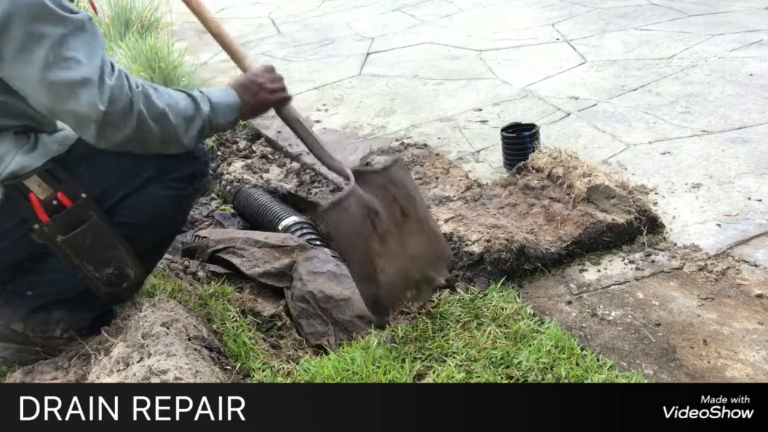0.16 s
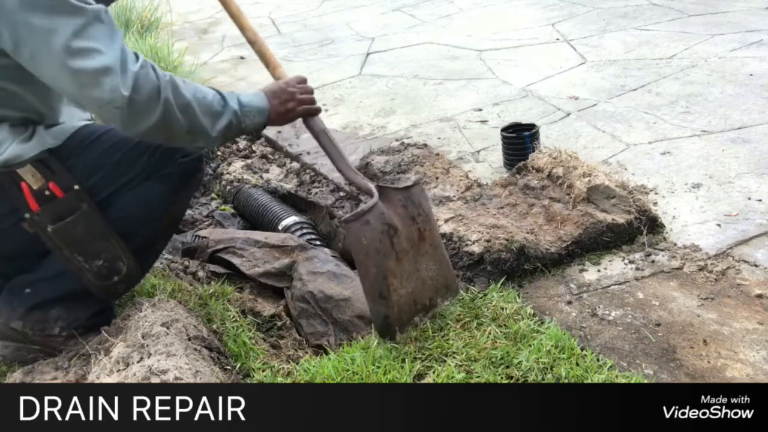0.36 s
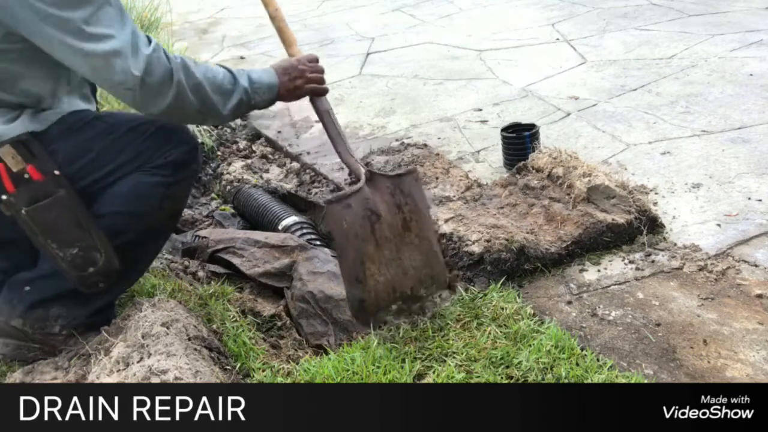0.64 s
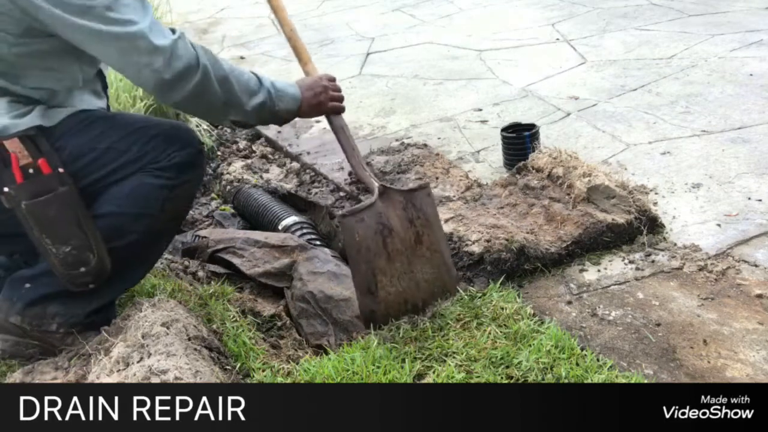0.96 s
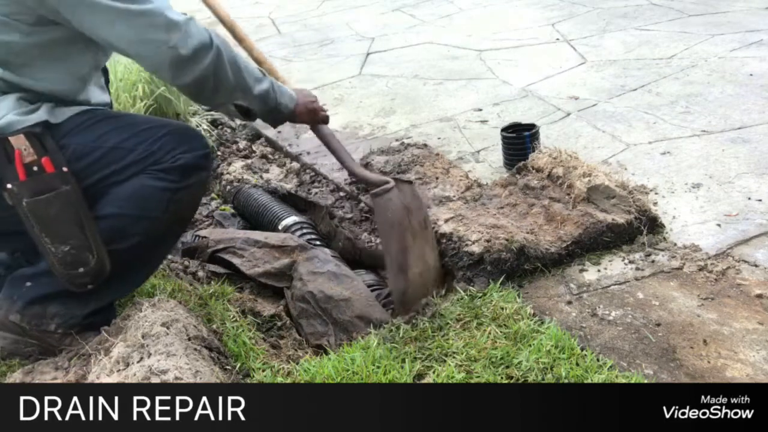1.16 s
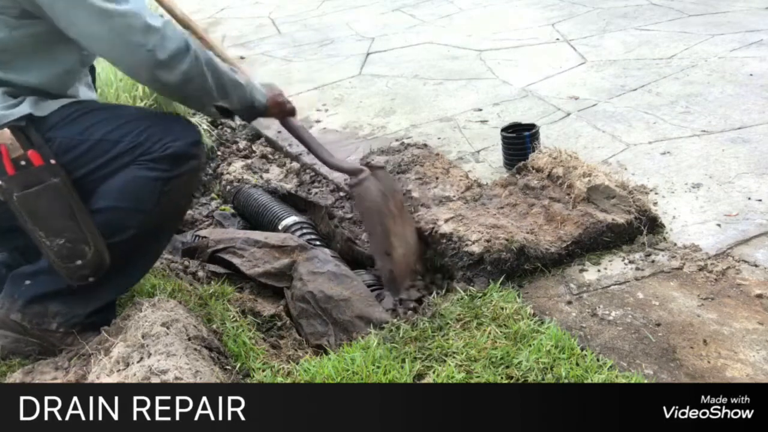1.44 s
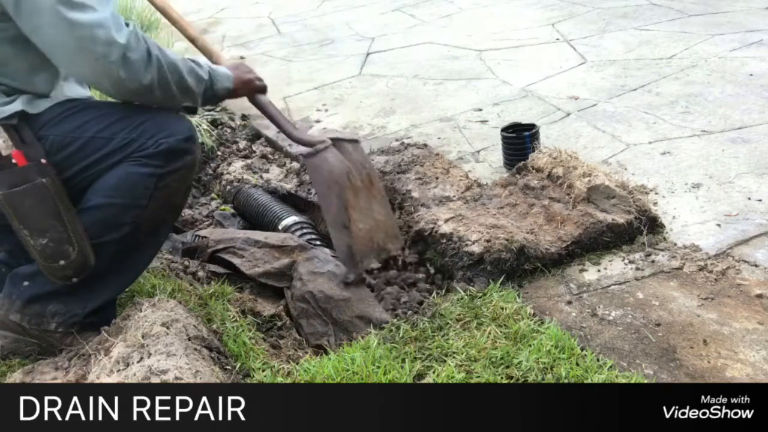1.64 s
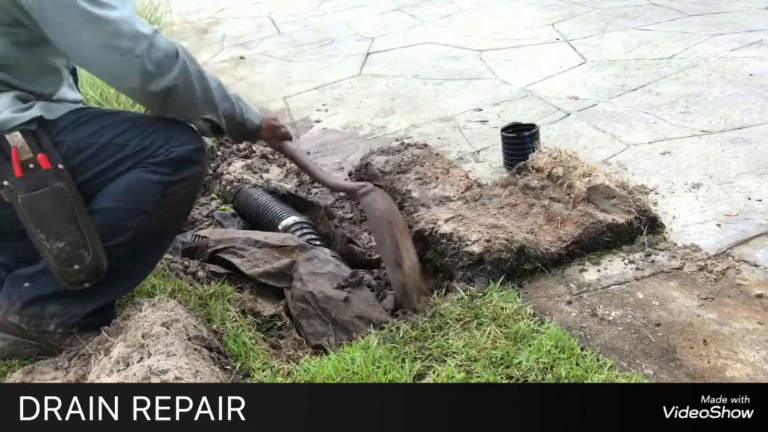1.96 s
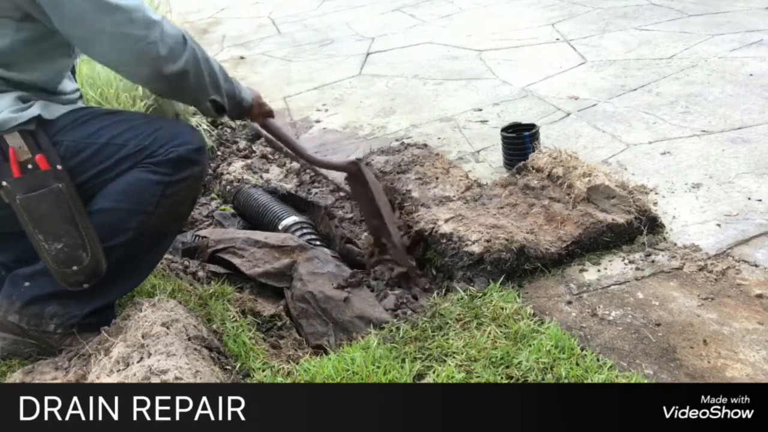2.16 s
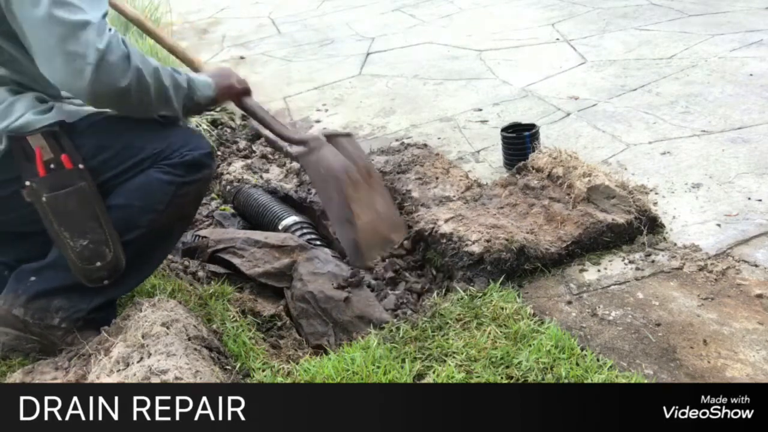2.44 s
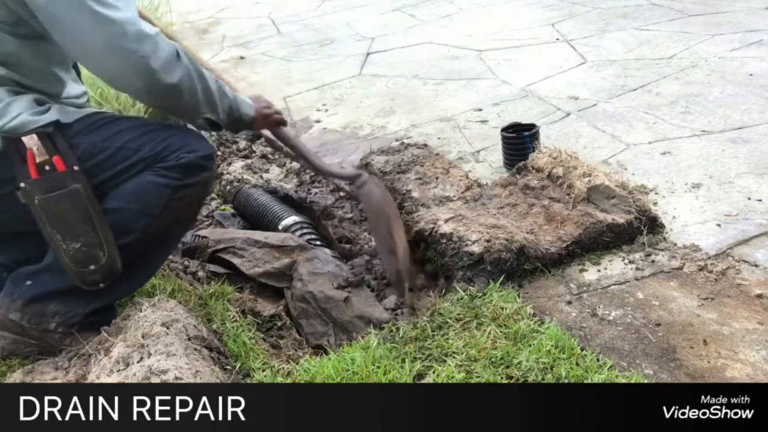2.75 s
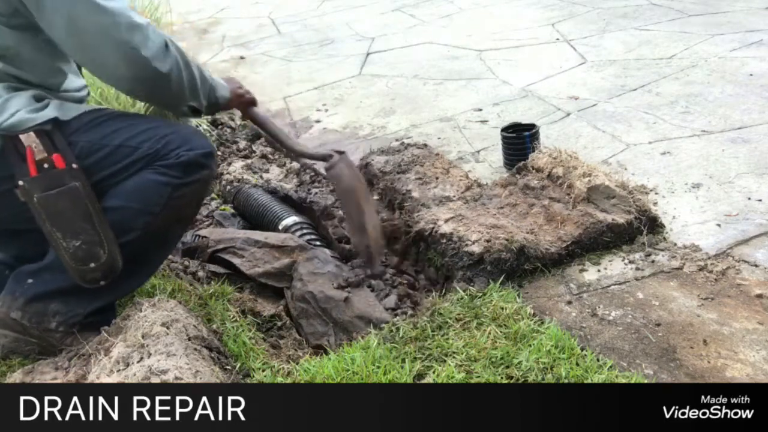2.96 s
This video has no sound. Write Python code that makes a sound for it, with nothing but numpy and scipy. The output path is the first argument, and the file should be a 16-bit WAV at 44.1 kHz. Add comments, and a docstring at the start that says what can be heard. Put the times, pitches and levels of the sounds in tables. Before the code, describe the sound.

A steel shovel scrapes and clanks through damp, stony soil, pushing it into a trench.

```python
"""An open yard, microphone close to a trench: a steel shovel pushes damp, stony soil back in with a few strokes.
Grit and soil are swarms of tiny pings; stones crack as noise bursts and set the modes of the blade ringing.
Brief squeals are wavering tones; crumbs and clods drop as noise bursts, the clods with a low knock.
Soft rustles come before the first stroke. Far off, engine tones and a drone hum over a low outdoor rumble."""
import sys
import numpy as np
from scipy import signal
from scipy.fft import rfft, irfft, next_fast_len
from scipy.io import wavfile
from scipy.ndimage import map_coordinates

SR = 44100
rng = np.random.default_rng(int(sys.argv[2]) if len(sys.argv) > 2 else 0)


def write(x):
    x = np.atleast_2d(x).T
    wavfile.write(sys.argv[1], SR, np.round(np.clip(x, -1, 1) * 32767).astype(np.int16))


N = 136710  # samples, 3.1 s

# Colour of landing crumbs, also of the yard's answer. Each row: frequency in Hz, gain in dB.
CRUMB_COLOUR = [(100, -51), (350, 4.5), (700, 1), (2000, 5.5), (4000, 5), (6500, 1), (8500, -8.5),
                (15500, -13.5)]


def amp(db):
    """Decibels to gain."""
    return 10 ** (np.asarray(db) / 20)


def unit(x):
    """Scaled to rms 1."""
    return x / np.sqrt(np.mean(x ** 2) + 1e-20)


def along(points, hz):
    """Gain read from (Hz, dB) points on a log frequency axis."""
    f, v = np.transpose(points)
    return amp(np.interp(np.log(hz + 1), np.log(f + 1), v))


def tilted(points, tilt_db):
    """A spectrum made brighter or duller above 1 kHz, in dB per octave."""
    return lambda hz: along(points, hz) * amp(tilt_db * np.log2(np.maximum(hz, 1000)))


def filtered(x, response):
    """x times a response of frequency."""
    m = next_fast_len(len(x) + 8192)
    spectrum = rfft(x, m) * response(np.fft.rfftfreq(m, 1 / SR))
    return irfft(spectrum, m)[:len(x)]


def wobble(rate, size=N):
    """A smooth random curve, rate knots a second."""
    knots = rng.standard_normal(4096)
    return map_coordinates(knots, [np.arange(size) * rate / SR], mode="wrap")


def fading(t, t60):
    """Exponential decay that falls by 60 dB in t60 seconds."""
    return np.exp(-np.log(1000) * t / t60)


def burst(response, rise_s, t60):
    """Coloured noise that rises fast and dies away."""
    t = np.arange(SR // 4) / SR
    noise = unit(filtered(rng.standard_normal(len(t)), response))
    return noise * (1 - np.exp(-t / rise_s)) * fading(t, t60)


def add(out, s, x):
    """Mix x into out at time s."""
    part = out[round(s * SR):][:len(x)]
    part += x[:len(part)]


def grains(per_s, spread_db, top_hz, life_s=.0017, size=256):
    """Tiny random contacts, each a short ping of its own pitch: many weak, a few strong."""
    chance = rng.random((N, 4))
    start = np.flatnonzero(chance[:, 0] < per_s / SR)
    _, pitch, strength, phase = chance[start].T.astype("f4")[:, :, None]
    hz = pitch * min(top_hz, SR / 2)
    gain = amp(-spread_db * np.log(np.maximum(strength, .004)))
    t = np.arange(size, dtype="f4") / SR
    pings = gain * np.exp(-t / life_s) * np.sin(2 * np.pi * (hz * t + phase))
    places = start[:, None] + np.arange(size)
    return np.bincount(places.ravel(), pings.ravel(), N)[:N]


def seating(t):
    """How the blade sits in the soil at time t: firmer seating damps its ring sooner."""
    # Each row: time in seconds, level of the ring in dB, brightness of the ring in dB per octave,
    # t60 of the ring in seconds, gain of the coarse low grit in dB.
    blade_seats = [(.85, -1, -5.5, 0.052, -4), (1.24, -2, -3.5, .04, -2), (1.42, -4, -6, 0.014, -2.5),
                   (2.1, -2, 5, 0.032, 1), (2.73, -0.5, -5.5, 0.059, -5.5), (2.85, 0, 1.5, 0.032, 1),
                   (2.95, -7, 2, 0.13, 0.5)]
    s, *columns = np.transpose(blade_seats)
    return [np.interp(t, s, c) for c in columns]


def scraping():
    """Grit grinds in judders along the blade while the soil ahead of it crumbles."""
    # Movements of the blade, one list each. Each row: time in seconds, level of the grinding in dB,
    # level of the shifting soil in dB (both before the trims below), treble lift of the grinding in dB.
    movements = [
        [(.87, -39.5, -31.5, 11), (.925, -46.5, -64, -5), (1.01, -47, -46.5, 5), (1.05, -35.5, -43, -2),
         (1.085, -39.5, -34.5, -6), (1.125, -25, -29.5, -3), (1.18, -25.5, -37.5, 0), (1.245, -21, -34, -0.5),
         (1.3, -23.5, -41, -2.5), (1.33, -30.5, -43.5, 3), (1.445, -35.5, -56, 0.5), (1.49, -27.5, -48.5, 3),
         (1.565, -29, -43.5, 2), (1.585, -38, -45, 1), (1.64, -63, -50, -7)],
        [(1.64, -50, -64, -7), (1.68, -44.5, -37, -7), (1.705, -47.5, -50.5, -4), (1.745, -36, -35.5, -13),
         (1.775, -43, -42, -11), (1.835, -54, -61, -4), (1.88, -50, -37, -20), (1.912, -52, -55, 1)],
        [(1.935, -58, -31, 3), (1.955, -36.5, -42, 2), (1.985, -28.5, -38.5, 1), (2.01, -35.5, -45, -3),
         (2.025, -21.5, -39.5, -1.5), (2.09, -29, -38.5, 7), (2.155, -22.5, -44, 0.5), (2.2, -30.5, -42, -1),
         (2.245, -27, -43.5, 3), (2.285, -34, -36.5, -20), (2.305, -55, -50, 12), (2.35, -50.5, -55, -6),
         (2.425, -51, -47.5, -2), (2.6, -62, -61, -13), (2.712, -54, -51, 3)],
        [(2.735, -25, -35, -10), (2.775, -22.5, -41.5, 3), (2.81, -25, -35, 1.5), (2.822, -22, -31.5, 14),
         (2.845, -19.5, -23.5, 3), (2.868, -31, -41, 1), (2.916, -40.5, -51, 6.5), (2.96, -32, -50.5, 1),
         (3.028, -26, -40.5, 1), (3.046, -23.5, -31.5, 7.5), (3.06, -23.5, -37, -9), (3.1, -29, -54, -21)],
    ]
    # Colour of the grit. Each row: frequency in Hz, gain in dB.
    grit_colour = [(100, -50), (300, -19), (860, -13), (1050, -3), (1450, -1), (2250, -3.5), (2870, -2),
                   (5300, -2.5), (6500, -4), (7800, -11), (9700, -6), (10500, -11.5), (15500, -13.5)]
    # Colour of the soil. Each row: frequency in Hz, gain in dB.
    soil_colour = [(60, -49), (150, -17), (280, 4.5), (550, 7), (1100, 3), (1800, -3.5), (4000, -26)]
    grit_trim_db, soil_trim_db = -1.5, -0.5
    treble_hz, coarse_hz = 6000, 2100  # where the treble lift sets in, where the coarse grit ends
    t = np.arange(N) / SR
    grind, shift, lift = np.zeros((3, N))
    for movement in movements:
        s, grind_db, shift_db, treble_db = np.transpose(movement)
        during = (t >= s[0]) & (t <= s[-1])
        grind += during * amp(np.interp(t, s, grind_db))
        shift += during * amp(np.interp(t, s, shift_db))
        lift += during * np.interp(t, s, treble_db)
    judder = unit(amp(1.4 * wobble(260)))

    grit_grains = grains(per_s=16000, spread_db=2, top_hz=16500)
    grit_texture = unit(filtered(grit_grains, lambda hz: along(grit_colour, hz)))
    grit = amp(grit_trim_db) * grind * judder * grit_texture
    treble = filtered(grit, lambda hz: 1 - 1 / (1 + (hz / treble_hz) ** 6))
    grit = grit + (amp(lift) - 1) * treble
    coarse_db = seating(t)[-1]
    coarse = filtered(grit, lambda hz: 1 / (1 + (hz / coarse_hz) ** 6))
    grit = grit + (amp(coarse_db) - 1) * coarse

    soil_grains = grains(per_s=1800, spread_db=1, top_hz=2500)
    soil_texture = unit(filtered(soil_grains, lambda hz: along(soil_colour, hz)))
    soil = amp(soil_trim_db) * shift * judder * soil_texture
    return grit, soil


def strikes():
    """Each stone cracks against the edge of the blade."""
    # Each row: start in seconds, level in dB before the trim, brightness in dB per octave, t60 in seconds.
    stones = [(.464, -25.5, 4, 0.016), (.486, -37, 0, 0.014), (0.523, -30.5, 5, 0.03),
              (0.835, -9, -1, 0.04), (0.855, -6.5, 0, 0.058), (1.0601, -13.5, -2, 0.024),
              (1.093, -14, -2.5, 0.039), (1.1413, -5, 0.5, 0.018), (1.1948, -11, -2, 0.021),
              (1.2293, -11, -14, 0.032), (1.241, -6.5, -1.5, 0.036), (1.268, -7, 10, 0.0096),
              (1.293, -8.5, 0, 0.023), (1.9166, -15.5, 0, .07), (1.92, 3, 8, 0.0094),
              (1.927, -8.5, -1, 0.023), (1.933, -5, -0.5, 0.016), (1.995, -6, 0, 0.024),
              (2.0167, 1.5, 4, 0.0068), (2.0324, -3.5, 1, .012), (2.049, -12, -7, 0.0047),
              (2.063, -5.5, 7.5, 0.023), (2.715, -17.5, 3.5, 0.041), (2.7282, 1, 0, 0.031),
              (2.751, 0.5, 1, 0.014), (2.793, -3.5, 3.5, 0.024), (2.823, -7, -2, 0.037),
              (2.835, -5, 0, 0.06), (2.93, -19.5, 5, 0.043), (3.043, -7, 1.5, 0.079),
              (3.075, -9, -1, 0.035)]
    # Colour of the crack. Each row: frequency in Hz, gain in dB.
    crack_colour = [(60, -35), (200, -8.5), (500, -25), (1100, -3), (1900, 2.5), (3500, 4), (5800, 3),
                    (7500, -4), (10500, -6), (15500, -16)]
    trim_db, rise_s = -7.5, .0005
    out = np.zeros(N)
    for s, db, tilt_db, t60 in stones:
        add(out, s, amp(db + trim_db) * burst(tilted(crack_colour, tilt_db), rise_s, t60))
    return out


def blade(force):
    """The steel rings in its modes; the soil sliding over it keeps changing their strength and tuning."""
    # Modes of the blade. Each row: frequency in Hz before detuning, relative level in dB.
    modes = [(715, 2), (1000, 0), (1410, 2.5), (1906, 0), (2068, 12), (2270, 8.5), (2400, 4), (2875, 1),
             (3225, 6.5), (3490, 2), (4005, 1.5), (4538, 1.5), (5180, -2), (5390, 9), (5785, 3.5),
             (6130, 3), (6380, 7.5), (6790, 0), (8172, -2), (9580, 2.5), (9965, 3), (10915, 5), (11600, 6)]
    load_step_s, load_spread_db = .06, 2.5  # how often the soil reloads the blade, how unevenly
    load_detune, bedded_t60 = .005, .04  # share of detuning at this t60 in seconds; a shorter ring detunes more
    step = round(load_step_s * SR)
    t = np.arange(SR // 6) / SR
    hz, db = np.transpose(modes)
    out, force = np.zeros(N + step), np.pad(force, step)
    for start in range(0, N, step):
        ring_db, tilt_db, t60, _ = seating(start / SR)
        strength, detune, phase = rng.standard_normal((3, len(hz)))
        gain = amp(db + tilt_db * np.log2(hz) + load_spread_db * strength)
        tuned = hz * (1 + load_detune * detune * bedded_t60 / t60)
        tones = np.sin(2 * np.pi * (np.outer(tuned, t) + phase[:, None]))
        ring = gain @ tones * fading(t, t60)
        # overlapping half-sine windows pass the force from one loading to the next
        push = force[start:][:2 * step]
        push = push * np.sin(np.pi * np.arange(len(push)) / (2 * step))
        rung = signal.fftconvolve(push, ring / np.linalg.norm(ring))
        add(out, start / SR, amp(ring_db) * rung)
    return out[step:]


def squeals():
    """A stone sticks and slips on the steel: short tones, clean or rough, that swell quickly and fade."""
    # Each row: start in seconds, level in dB before flutter, pitch in Hz before waver,
    # length in seconds (the peak comes at a quarter of it), roughness as a factor.
    slips = [(.47, -40, 2050, 0.034, 0.4), (.518, -37.5, 2060, 0.029, 0.2), (0.855, -19, 2105, 0.018, 0.1),
             (0.852, -19, 3515, 0.015, .2), (1.089, -22, 4640, 0.016, 1.3),
             (1.11, -18.5, 2050, 0.019, 0.36), (1.232, -18.5, 2300, 0.034, 0.75),
             (1.631, -37, 2090, 0.023, 0.2), (2.736, -15, 2090, 0.015, 0.17), (2.814, -22, 8140, 0.022, .2),
             (2.823, -10, 1910, 0.0089, 0.54), (2.87, -25, 1830, 0.013, 1.1),
             (3.036, -18.5, 5500, .016, 0.8)]
    waver_rad, flutter_db, knots_per_s = 1.3, 3, 450  # depths at roughness 1
    t = np.arange(SR // 8) / SR
    out = np.zeros(N)
    for s, db, hz, length, rough in slips:
        u = 4 * t / length
        waver, flutter = [rough * wobble(knots_per_s, size=len(t)) for _ in range(2)]
        swell = amp(db + flutter_db * flutter) * u * np.exp(1 - u)
        add(out, s, swell * np.sin(2 * np.pi * hz * t + waver_rad * waver))
    return out


def falling_soil():
    """Crumbs land with a short crunch, clods with a brief low knock and a dull thud."""
    # Crumbs and pebbles. Each row: start in seconds, level in dB before the trim, brightness in dB per octave.
    landings = [(0.957, -31, 9), (0.9833, -25, 4), (1.6049, -23.5, 4.5), (1.636, -29, 2), (1.666, -31, 5),
                (1.7133, -24.5, 0.5), (1.726, -21, -0.5), (1.7497, -19.5, -2), (1.792, -35, 0),
                (1.8135, -25, 3), (1.85, -28, 2.5), (1.87, -32, 1), (2.3105, -27.5, 5.5),
                (2.373, -26.5, -2.5), (2.419, -24.5, -6), (2.46, -36, -1), (2.482, -34, 3.5),
                (2.5424, -31, -3), (2.607, -35, -8)]
    # Clods into the trench. Each row: start in seconds, level in dB before the trims, pitch in Hz.
    thuds = [(.838, -36, 1100), (0.858, -17, 520), (1.047, -22, 905), (1.07, -27, 530), (1.431, -21.5, 453),
             (1.657, -24, 494), (1.712, -19.5, 414), (1.7525, -11.5, 604), (1.758, -25, 960),
             (1.794, -20, 365), (1.862, -16, 644), (1.871, -27, 680), (1.93, -14, 630), (2.422, -33, 950),
             (2.431, -24, 549.6), (2.466, -24, 1010), (2.83, -10, 760), (2.841, -23, 497)]
    crumb_trim_db, thud_trim_db, knock_trim_db = -5, -11, -8
    width_oct = 0.96  # spread of the thud to either side of its pitch
    out = np.zeros(N)
    for s, db, tilt_db in landings:
        crunch = burst(tilted(CRUMB_COLOUR, tilt_db), rise_s=0.00036, t60=0.042)
        add(out, s, amp(db + crumb_trim_db) * crunch)
    t = np.arange(SR // 20) / SR
    for s, db, pitch_hz in thuds:
        colour = lambda hz: 1 / (1 + np.abs(np.log2((hz + 1) / pitch_hz) / width_oct) ** 3)
        add(out, s, amp(db + thud_trim_db) * burst(colour, rise_s=0.0023, t60=0.072))
        knock = np.sin(2 * np.pi * pitch_hz * t) * fading(t, t60=.014)
        add(out, s, amp(db + knock_trim_db) * knock)
    return out


def rustling(edge_s=0.018):
    """Light brushing over soil and cloth as the shovel is set in place: roughened noise with soft edges."""
    # Each row: start in seconds, length in seconds, level in dB.
    brushes = [(0.0, 0.19, -55.5), (0.337, .11, -55), (0.459, 0.071, -45), (0.586, 0.11, -58.5)]
    # Colour of the brushing. Each row: frequency in Hz, gain in dB.
    brush_colour = [(200, -12), (1000, 6), (2100, 4.5), (3500, 0.5), (6500, -2), (8500, -7), (15000, -9.5)]
    t = np.arange(N) / SR
    level = np.zeros(N)
    for s, length, db in brushes:
        inside_s = np.minimum(t - s, s + length - t)
        level += amp(db) * np.clip(inside_s / edge_s + .5, 0, 1)
    rough = rng.standard_normal(N) * amp(1.5 * wobble(210))
    return level * unit(filtered(rough, lambda hz: along(brush_colour, hz)))


def yard(x):
    """A faint, short answer from paving and walls, as a decaying noise tail."""
    tail = burst(lambda hz: along(CRUMB_COLOUR, hz), rise_s=0.015, t60=0.079)
    return signal.fftconvolve(x, tail / np.linalg.norm(tail))[:N]


def background():
    """Low orders of a far engine as wavering sines, a deep drone and the outdoor air as shaped noise."""
    # Far engine. Each row: time in seconds, firing rate in Hz (the orders are its multiples),
    # level of the second order in dB, level of the fourth in dB (both before wavering, as sine rms).
    engine_course = [(0, 68.14, -46, -44.5), (.4, 68.33, -54, -58), (1, 69.47, -50.5, -57),
                     (1.42, 69.97, -54.5, -51.5), (1.651, 70.86, -43, -55.5), (2.55, 71.3, -36.5, -51.5),
                     (2.8, 70.44, -39, -65), (3.1, 71.5, -43.5, -48)]
    # Colour of the outdoor air. Each row: frequency in Hz, gain in dB.
    air_colour = [(20, -20), (38, -6), (52, -4), (75, 5.5), (100, -1.5), (135, 4), (180, -1), (270, -6),
                  (400, -16.5), (700, -22), (1500, -23.5), (3000, -29), (6500, -32.5), (8500, -39.5),
                  (15000, -44)]
    third_db, drone_db, air_db = -60.5, -53, -46.5
    drone_hz = 53
    waver_db, waver_per_s = 2.2, 10
    t = np.arange(N) / SR
    s, *columns = np.transpose(engine_course)
    rate_hz, second_db, fourth_db = [np.interp(t, s, c) for c in columns]
    turn = 2 * np.pi * np.cumsum(rate_hz) / SR
    engine = np.zeros(N)
    for order, db in enumerate([second_db, third_db, fourth_db], 2):
        engine += amp(db + waver_db * wobble(waver_per_s)) * np.sin(order * turn)
    drone_level = amp(drone_db + waver_db * wobble(waver_per_s))
    drone = drone_level * np.sin(2 * np.pi * drone_hz * t + 0.34 * wobble(4.4))
    air = unit(filtered(rng.standard_normal(N), lambda hz: along(air_colour, hz)))
    return np.sqrt(2) * (engine + drone) + amp(air_db) * air


def scene():
    """The shovel work and its answer from the yard, over the background."""
    scrape_ring_db, strike_ring_db, yard_db = -6, -6, -21.5
    grit, soil = scraping()
    cracks = strikes()
    ring = blade(amp(scrape_ring_db) * grit + amp(strike_ring_db) * cracks)
    work = grit + soil + cracks + ring + squeals() + falling_soil() + rustling()
    return (work + amp(yard_db) * yard(work) + background())[None]


def record(dry):
    """The recorder thins the deep bass, clips at full scale, then keeps nothing above its band limit."""
    low_cut_hz, top_hz = 32.5, 15900
    thinned = filtered(dry[0], lambda hz: hz ** 4 / np.hypot(hz ** 4, low_cut_hz ** 4))
    return filtered(np.clip(thinned, -1, 1), lambda hz: hz < top_hz)[None]


dry = scene()
out = record(dry)
write(out)
```